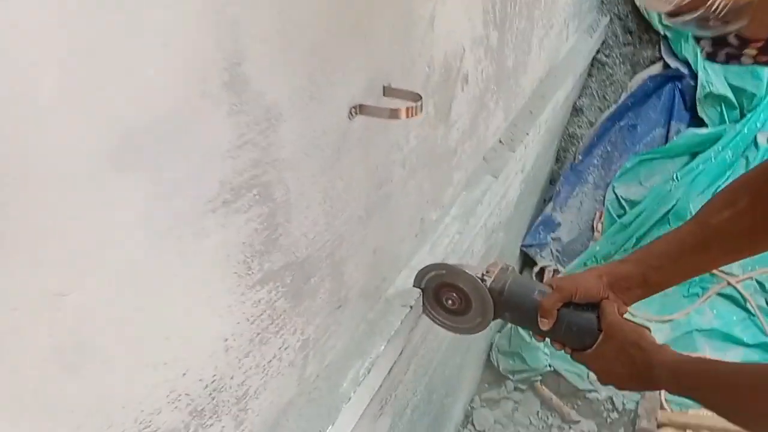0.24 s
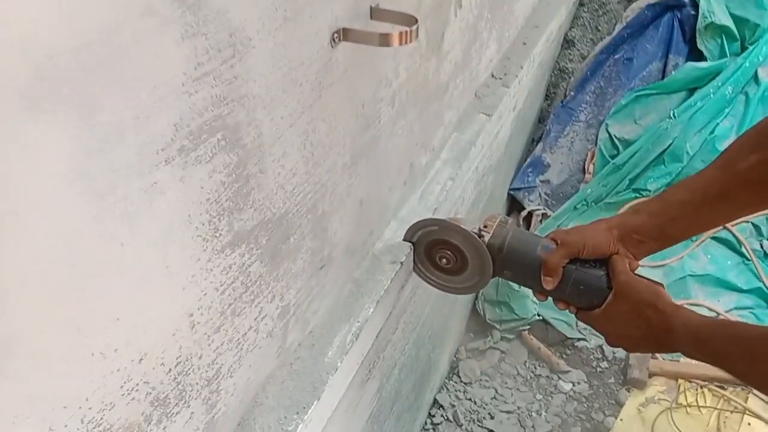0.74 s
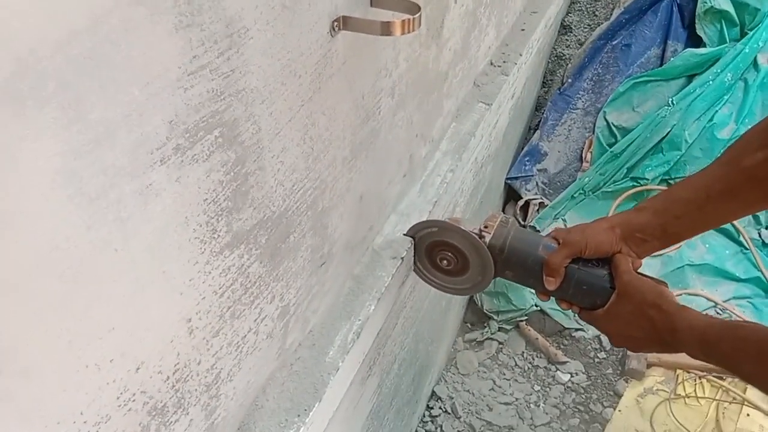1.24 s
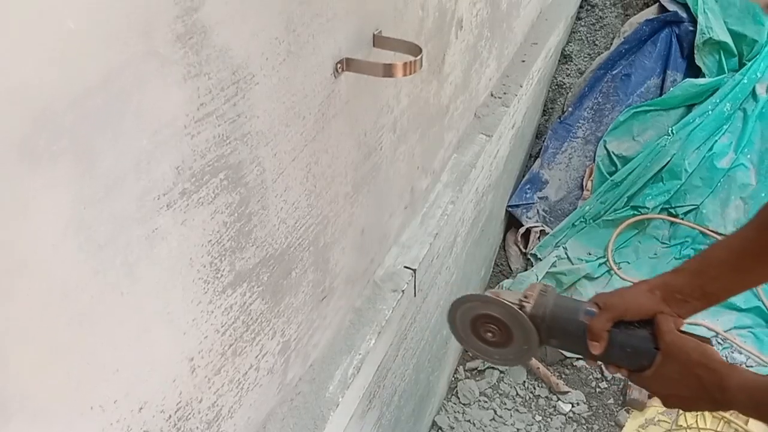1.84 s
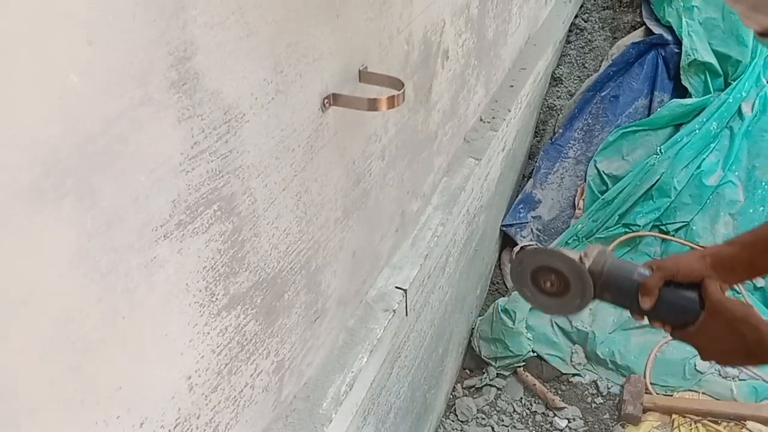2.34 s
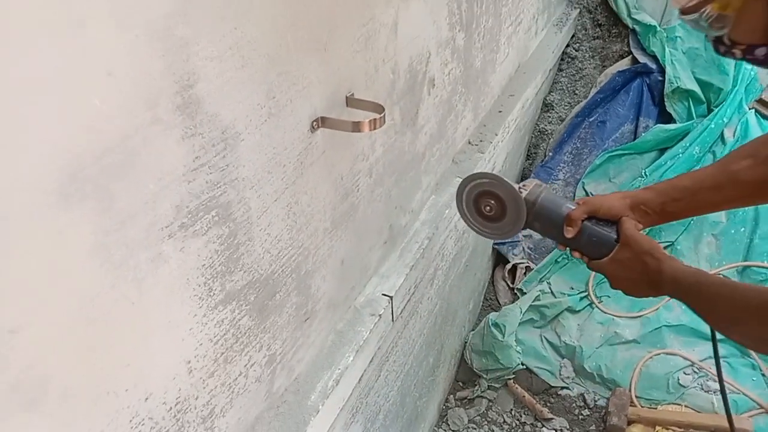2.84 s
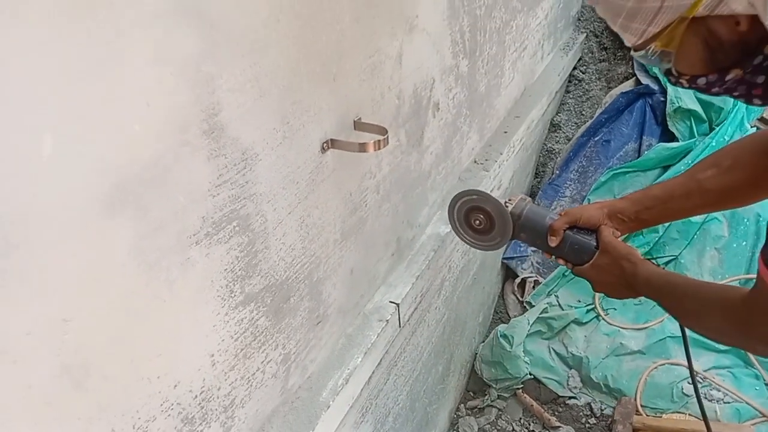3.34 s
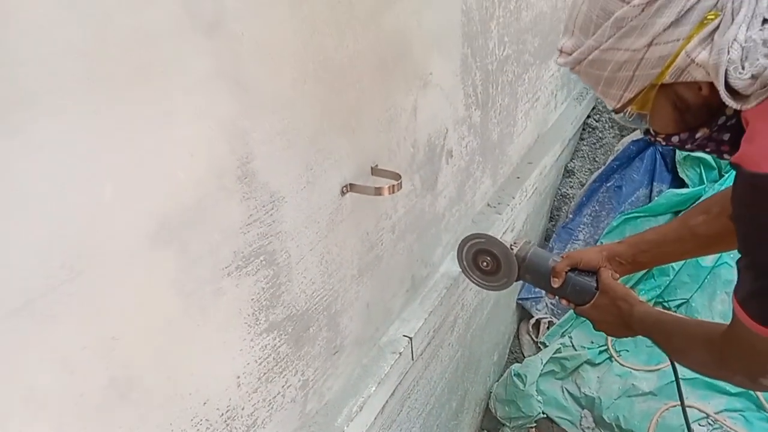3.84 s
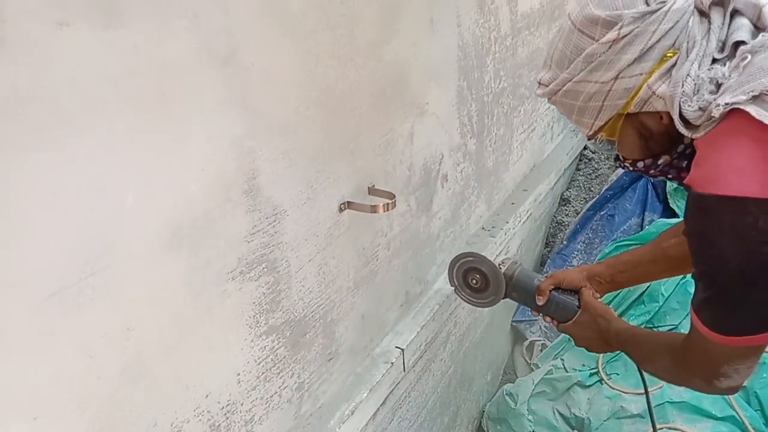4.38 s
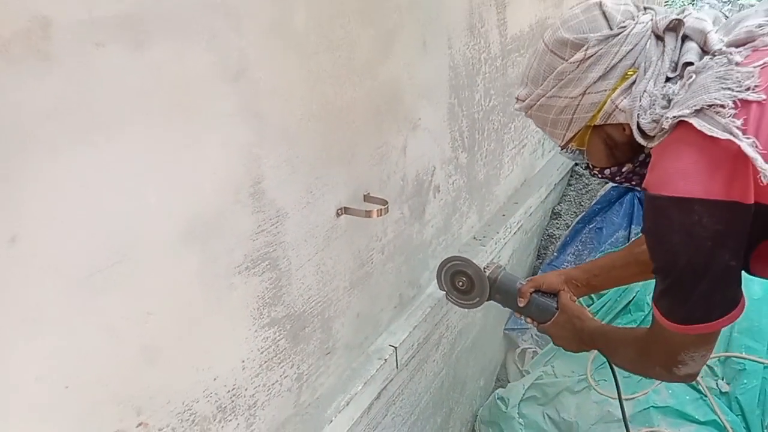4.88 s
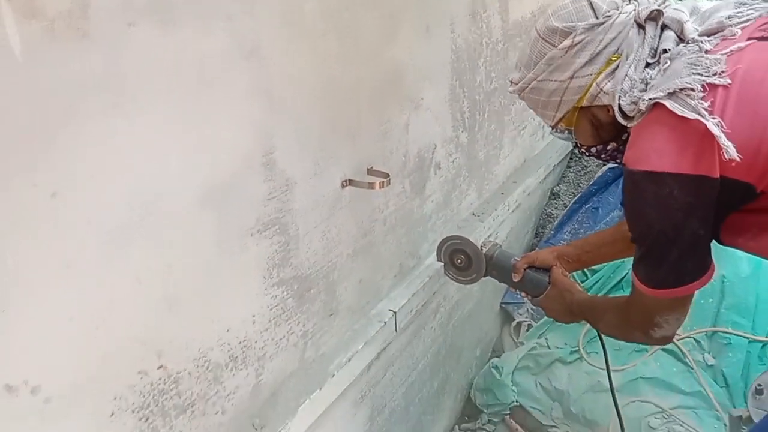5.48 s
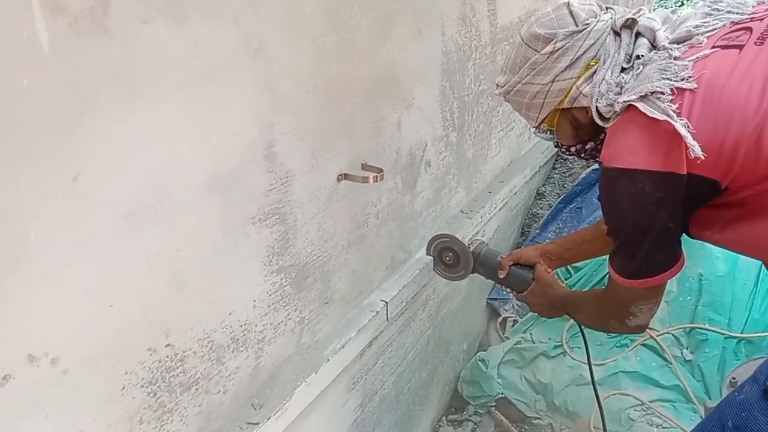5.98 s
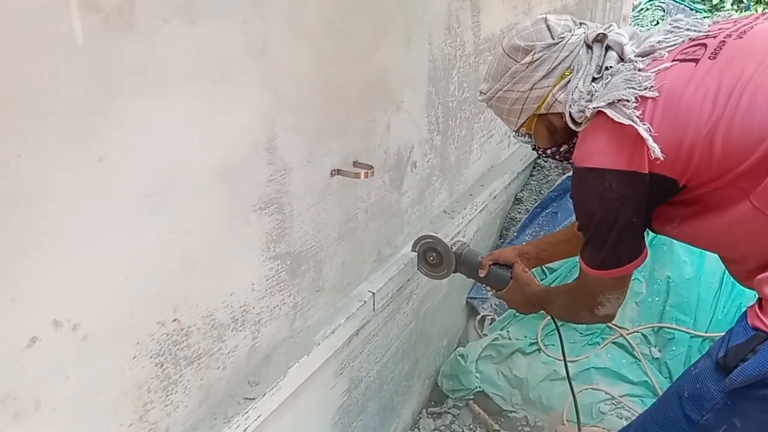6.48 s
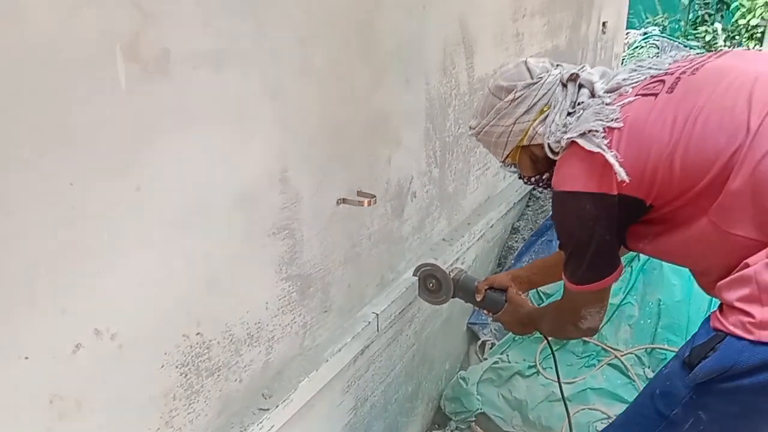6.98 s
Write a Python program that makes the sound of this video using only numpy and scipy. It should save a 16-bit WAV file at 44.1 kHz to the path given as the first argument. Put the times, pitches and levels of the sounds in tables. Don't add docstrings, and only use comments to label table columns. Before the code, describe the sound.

Outdoors, a handheld electric grinder runs throughout, one to two metres from a single microphone, dry and bright with little bass. From 0 to 1.8 seconds its disc cuts plastered wall: rushing fan and brush roar, fast gear buzz, dense steely ringing and crushed-grit hiss, strongest after 0.6. Chips tick and pop against the microphone, mostly between 0.45 and 1.75, and loud bursts overload into low thuds. Around 1.8 the disc scrapes out of its groove and the ringing drops away. From 2 to 3.5 the free-running motor roars on while loose gears knock in short, uneven, metallic clusters pitched near six kilohertz. From about 3.5 it eases back in; knocks continue until roughly 4.7 as ringing returns. By 4.9 the second cut is strong, gritty and fluttering, with a different ring, lasting to the end at 7.2 while getting slightly more distant. Faint outdoor rumble lies underneath.

```python
import sys
import numpy as np
from scipy import signal
from scipy.fft import rfft, irfft, next_fast_len
from scipy.io import wavfile
from scipy.ndimage import uniform_filter1d, map_coordinates

SR = 44100
rng = np.random.default_rng(int(sys.argv[2]) if len(sys.argv) > 2 else 0)


def natural_amplitude(level_db):
    exponent = np.asarray(level_db, float) / 20
    return 10 ** exponent


def generate_wav(signal):
    frames = np.transpose(np.atleast_2d(signal))
    scaled = np.clip(frames, -1, 1) * 32767
    pcm = np.round(scaled).astype(np.int16)
    wavfile.write(sys.argv[1], SR, pcm)


N = 318402
TIME = np.arange(N) / SR

# [t/s, pose]
POSE = [
    (0, 0),
    (1.8, 0),
    (2.4, 1),
    (3.4, 1),
    (4.3, 2),
    (7.22, 2),
]
# [t/s, distance/m]
DISTANCE = [(0, 1.37), (.6, 1.07), (1.8, 1.29), (1.9, 1.17), (2.9, 1.18), (4.9, 1.47), (5.2, 1.76),
            (6.3, 2.06), (7.22, 2.2)]
# [t/s, contact 0-1]
CONTACT = [
    (0, 0.99),
    (1.85, 0.8),
    (1.89, 0.1),
    (3.5, 0.07),
    (3.75, 0.6),
    (4.6, 0.6),
    (7.22, 0.86),
]
# [t/s,
# level/dB]
DISC_SWELL = [(0, -3.5), (.2, -5), (.56, -1), (.8, 1), (1.35, 0.5), (1.72, -2), (1.85, -10), (1.9, -10),
              (2.8, 3.5), (3.5, 3), (3.84, -2), (4.7, 0.5), (4.9, 5), (5.3, 4), (5.65, 1.5), (6.4, 3), (6.8, 4),
              (7.22, 2)]
# [t/s, pitch ratio at 1200 Hz]
TILT = [(0, .98), (.6, .92), (1.8, .97), (2.5, 1.06), (3.1, 1.04), (4.1, 1.11), (4.6, 1.01), (5, .95),
        (5.4, 1.01)]
# [f/Hz, density/dB per Hz]
ROAR = [(120, -90), (220, -47.5), (330, -23), (525, -18.5), (1000, -12.5), (1950, -12), (2500, -6.5),
        (2800, -7.5), (3700, -3.5), (4450, -6), (5500, -5.5), (6400, -6.5), (7200, -2), (7900, -3.5),
        (8800, -9.5), (9400, -22.5), (15500, -34)]
# [f/Hz, level/dB in pose 0, in pose 1, in pose 2]
HOUSING = [(1000, -41.5, -44.5, -40.5), (1327, -42, -46, -47), (2167, -43.5, -37, -38.5),
           (2450, -36, -34, -36), (2890, -51, -36, -39)]
# [f/Hz, level/dB in pose 0, in pose 1, in pose 2]
GUARD = [(3434, -34.5, -48, -29), (3066, -41, -33.5, -34)]
# [t/s, resonance f/Hz, level/dB]
GAP = [(0, 4150, -37), (.45, 4100, -26), (.55, 3630, -31), (1, 3750, -24), (1.8, 3800, -23),
       (2.1, 3684, -28), (2.5, 3470, -26.5), (2.8, 3906, -27.5), (3.2, 4250, -32), (3.8, 4500, -53),
       (5, 4110, -38.5), (7.22, 4220, -32.5)]
# [f/Hz, rms level/dB]
TONES = [(452.2, -59), (683.7, -58)]
DISC_HZ = [2430, 4700, 4790, 7200, 7570, 8390, 9030, 9535, 9970, 10630, 11200, 11765, 12530, 13070, 13590,
           14540, 14910, 15400]
# [width/Hz, level/dB]
DISC_FIRST_CUT = [(90, -30), (111, 11.5), (150, -11), (70, -16), (80, -22), (45, 11.5), (45, -21),
                  (110, -12), (200, -32), (100, -1.5), (60, -18), (100, -0.5), (190, 3.5), (200, -9),
                  (70, -29), (120, -5), (150, -9), (80, -20)]
# [width/Hz, level/dB]
DISC_SECOND_CUT = [(101, -23), (149, -1.5), (229, 2.5), (80, -6), (80, -19), (69.4, 2), (60, -27),
                   (130, -42), (192.4, -30), (80, -7.5), (70, -17), (100.3, -10), (150, -10), (130, -3.5),
                   (200, -23), (400, -15), (250, -22), (80, -10)]
# [f/Hz, density/dB per Hz]
DUST = [(500, -5), (1500, -20.5), (4000, -17.5), (5400, 1), (6500, 2.5), (7600, -36), (8100, -34),
        (9200, -10), (10000, -1.5), (11300, -24), (12200, -45.5), (13200, -8), (14000, -15), (15500, -5.5)]
# [t/s, level/dB]
CHATTER = [(0.0, -13.5), (0.74, -16), (1.2, -17), (1.68, -16), (1.81, -10.5), (1.9, -20), (2.27, -16),
           (2.85, -22.5), (2.97, -19), (3.32, -22.5), (3.46, -22.5), (3.72, -21), (4.0, -17.5), (4.38, -19),
           (4.58, -14), (5.11, -17.5), (6.01, -17.5), (7.22, -19.5)]
# [first knock t/s, last knock t/s, level/dB]
BURSTS = [(2.033, 2.0496, -4.5), (2.075, 2.0745, -2), (2.1045, 2.1266, -9), (2.158, 2.1743, -10),
          (2.2084, 2.22, -11), (2.2464, 2.2861, -10.5), (2.3114, 2.3295, -15), (2.4049, 2.417, -4.5),
          (2.491, 2.4965, -5), (2.5691, 2.6094, -4), (2.647, 2.6468, -7), (2.69, 2.7054, -5.5),
          (2.8464, 2.8543, -4.5), (2.9496, 2.9559, -2), (2.9772, 2.9774, -1.5), (3.18, 3.2112, -3),
          (3.2502, 3.2777, -6), (3.321, 3.3369, -4), (3.3776, 3.3776, -2.5), (3.4043, 3.4588, -3.5),
          (3.492, 3.4965, -2), (3.663, 3.6798, -9), (3.836, 3.91, -6), (3.949, 3.973, -6),
          (4.013, 4.0954, -13.5), (4.1356, 4.2181, -5.5), (4.3408, 4.42, -5.5), (4.4337, 4.4696, -4.5),
          (4.5312, 4.5765, -10.5), (4.6594, 4.683, -6)]
# [t/s, f/Hz]
CASE_HZ = [(0, 6050), (.6, 6350), (1.7, 6350), (1.9, 6180), (2.5, 6080), (3.2, 6270), (4.15, 6200),
           (4.75, 5900), (5.5, 6150)]
# [f/Hz, width/Hz, level/dB]
CASE = [(5830, 66, -9), (6130, 46, 6.5), (5890, 78, -30), (6946, 380, 9.5)]
# [f/Hz, density/dB per Hz]
CASE_HIGH = [(10500, -30), (11400, -16), (11800, 0), (12150, -5), (12600, -1), (13200, -3), (13900, -11),
             (14400, -13), (14700, -10), (15000, -15), (15500, -19)]
# [t/s, signed push, length/ms]
CHIPS = [(.4598, 0.13, 1.4), (.4939, -0.082, 1), (.6068, -0.02, 2.1), (.6358, 0.049, .9),
         (.674, 0.026, 3.0), (.761, 0.14, 1.2), (.8815, 0.054, 1.4), (.927, 0.019, 3.0),
         (0.9417, 0.014, 0.87), (0.9431, 0.16, 6.1), (1.0326, -0.13, 0.51), (1.0631, 0.22, 1.5),
         (1.1245, 0.11, 1.3), (1.2916, 0.28, 0.23), (1.2918, -0.047, 0.34), (1.2926, 0.16, 0.62),
         (1.4615, -0.032, 1.5), (1.5813, -0.033, 1.5), (1.7347, 0.012, 1.4), (1.8369, 0.0091, 1)]
# [f/Hz, density/dB per Hz]
RUMBLE = [(20, -6), (40, 0), (110, -3), (200, -12), (400, -45)]

ROAR_DB, RING_DB, DUST_DB = -34.5, -26, -33.5
MAINS_HZ = 100
IDLE_DUST_DB, SHALLOW_DUST_DB = -9, -7.5
SKITTER_DB, SKITTER_RATE = 1.2, 22
KNOCK_GAP_S = .0095
DEEP_CUT_S = (.5, 1.7)


def motor(load):
    throb = 1 + 0.025 * mains_wave(np.sin)
    rush = throb * natural_amplitude(0.41 * load + 1.12 * wobble(200)) * rng.standard_normal(N)
    roar = unit(filtered(rush, colour(ROAR)))
    roar_db = ROAR_DB + spread_db() + 13 + 0.28 * wobble(12)
    gap_hz, gap_db = curves(GAP)
    air = strands(GUARD, width_hz=480) + natural_amplitude(gap_db) * narrow(gap_hz, width_hz=620)
    air = throb * natural_amplitude(1.0 * load + 1.5 * wobble(30)) * air
    tones = second_cut() * sum(natural_amplitude(db + 5.5) * narrow(hz, width_hz=29) for hz, db in TONES)
    housing = natural_amplitude(-0.5) * strands(HOUSING, width_hz=79)
    return natural_amplitude(roar_db) * roar + air + housing + tones


def strands(table, width_hz):
    tilt = curves(TILT)[0]
    total = np.zeros(N)
    for hz, *pose_db in table:
        level = natural_amplitude(by_pose(pose_db) + 1.5 * wobble(1.756))
        pitch_hz = hz * tilt ** (1200 / hz) * (1 + .012 * wobble(1.2))
        total += level * narrow(pitch_hz, width_hz)
    return natural_amplitude(spread_db()) * total


def disc(load):
    swell_db, contact = curves(DISC_SWELL)[0], curves(CONTACT)[0]
    ring_db = RING_DB + spread_db() + swell_db + SKITTER_DB * wobble(SKITTER_RATE)
    ring_db = ring_db + 3.5 * np.minimum(ring_db + 31, 0)

    scrape_db = 6.5 * np.exp(-((TIME - 1.79) / .08) ** 2)
    pose_db = by_pose((0, IDLE_DUST_DB, SHALLOW_DUST_DB)) + 0.34 * IDLE_DUST_DB * (1 - contact)
    dust_db = DUST_DB + spread_db() + 0.44 * swell_db + pose_db + scrape_db
    dust_db = dust_db + 0.62 * SKITTER_DB * wobble(SKITTER_RATE)
    dust_db = dust_db + 1.6 * np.minimum(dust_db + 43.5, 0)

    stone = rng.standard_normal(N)
    steady = natural_amplitude(1.3 * load + 0.7 * wobble(20)) * stone
    first = unit(filtered(steady, disc_modes(DISC_FIRST_CUT)))
    second = unit(filtered(steady, disc_modes(DISC_SECOND_CUT)))
    far = second_cut()
    ring = (1 - far) * first + far * second
    grit = natural_amplitude(1.4 * load + 3 * wobble(150) + 1.5 * wobble(10)) * stone
    dust = unit(filtered(grit, colour(DUST)))
    return contact * natural_amplitude(ring_db + 3.5) * ring + natural_amplitude(dust_db + 10) * dust


def disc_modes(table):
    def response(f):
        gain = 0
        for centre, (width, db) in zip(DISC_HZ, table):
            detune = (centre ** 2 - f * f) / ((f + 1) * width)
            gain = gain + natural_amplitude(db) * (1 + detune ** 2) ** -.85
        return gain
    return response


def gears(load):
    t = np.arange(SR // 50) / SR
    rebound = 0.34 * (1 - np.exp(-t / 0.0017)) * np.exp(-t / 0.0067)
    blow = t / 0.00077 * np.exp(1 - t / 0.0005) + rebound
    size = np.abs(signal.fftconvolve(knock_force() + kick_force(), blow)[:N])
    case_hz, contact = curves(CASE_HZ)[0], curves(CONTACT)[0]
    note_hz = case_hz + 150 * wobble(450) + 420 * contact * wobble(600)
    note = np.sin(2 * np.pi * np.cumsum(note_hz) / SR)
    knock = filtered(size * note, lambda f: 0.8 + 0.35 * modes(CASE)(f))

    tooth_db = 2.5 * rng.standard_normal(N) + 1.0 * load + 2 * mains_wave(np.cos)
    teeth = (rng.random(N) < 900 / SR) * natural_amplitude(tooth_db)
    rattle = unit(np.abs(signal.fftconvolve(teeth, blow)[:N]))
    buzz = natural_amplitude(curves(CHATTER)[0] - 2.0 + 2.0 * wobble(35)) * rattle
    buzz_note = narrow(case_hz + 180 + 120 * wobble(60), width_hz=740)
    chatter = filtered(buzz * buzz_note, lambda f: 0.43 + .5 * modes(CASE)(f))

    hardness = uniform_filter1d(size + 0.26 * buzz, size=90, origin=44) ** 1.37
    high = filtered(hardness * natural_amplitude(2.1 * wobble(30)) * rng.standard_normal(N), colour(CASE_HIGH))
    rasp = contact * size * unit(filtered(rng.standard_normal(N), colour(ROAR)))
    ring = filtered(natural_amplitude(2.0) * knock + chatter, lambda f: 1 / (1 + (5150 / (f + 1)) ** 12))
    return ring + natural_amplitude(-5.5) * high + natural_amplitude(-8.5) * rasp


def knock_force(strays=28):
    force, chance = np.zeros(N), rng.standard_normal((len(BURSTS), 2, 16))
    for (first, last, db), (late, size) in zip(BURSTS, chance):
        count = round(abs(last - first) / KNOCK_GAP_S) + 1
        at = np.linspace(first, max(first, last), count)
        at[1:-1] += 0.22 * KNOCK_GAP_S * late[:count][1:-1]
        force[(at * SR).astype(int)] = natural_amplitude(db - 2.5 * np.clip(size[:count], -2, 1))
    place, size = rng.random((2, strays))
    at = np.interp(place, (0, 1), (1.9, 4.4))
    force[(at * SR).astype(int)] = natural_amplitude(-19 + 3.4 * (size + 3.5))
    return force


def kick_force():
    start, end = DEEP_CUT_S
    mains = np.arange(1, N / SR * MAINS_HZ - 1) / MAINS_HZ
    turns = np.arange(start, end, 1 / 165.3)
    at = np.concatenate([mains[(mains < start) | (mains > end)], turns])
    late, size = rng.standard_normal((2, len(at)))
    at = ((at + .0019 * (late - 1)) * SR).astype(int)
    force = np.zeros(N)
    force[at] = natural_amplitude(curves(CHATTER)[0][at] + 6 + 4 * np.clip(size, -3, 1.2))
    return force


def pattern(count=12):
    cycle = np.cumsum(33.4 * (1 + 0.0033 * wobble(1.97))) / SR
    return np.interp(cycle % 1, np.arange(count) / count, unit(rng.standard_normal(count)), period=1)


def chips():
    out, t = np.zeros(N + SR), np.arange(SR // 50) / SR
    for s, push, ms in CHIPS:
        shove = 3.5 * push * np.exp(-t / (ms * 0.00082)) * (1 - np.exp(-t / 0.00019))
        tick = 1.2 * abs(push) * np.exp(-t / .0006) * rng.standard_normal(len(t))
        swing = 0.53 * push * np.exp(-t / 0.00079) * np.sin(2 * np.pi * 1300 * t)
        out[round((s - .0004) * SR):][:len(t)] += shove + tick + swing
    return out[:N]


def floor():
    return natural_amplitude(-78 + 6 * wobble(6)) * unit(filtered(rng.standard_normal(N), colour(RUMBLE)))


def spread_db():
    return -20 * np.log10(curves(DISTANCE)[0])


def second_cut():
    return np.interp(TIME, (3.2, 4.9), (0, 1))


def by_pose(values):
    return np.interp(curves(POSE)[0], np.arange(3), values)


def mains_wave(shape):
    return shape(2 * np.pi * MAINS_HZ * TIME)


def unit(x):
    return x / np.sqrt(np.mean(x ** 2) + 1e-20)


def curves(rows):
    s, *cols = np.transpose(rows)
    return [np.interp(TIME, s, c) for c in cols]


def wobble(rate):
    at = np.arange(0, N + 32, 32)
    knots = rng.standard_normal(int(N * rate / SR) + 4)
    return np.interp(np.arange(N), at, map_coordinates(knots, [at * rate / SR]))


def filtered(x, response):
    m = next_fast_len(N + 8192)
    return irfft(rfft(x, m) * response(np.fft.rfftfreq(m, 1 / SR)), m)[:N]


def colour(points):
    hz, db = np.transpose(points)
    return lambda f: natural_amplitude(np.interp(np.log(f + 1), np.log(hz), db))


def modes(table):
    def response(f):
        total = 0
        for k, (centre, width, db) in enumerate(table):
            loss = 1j * f * width
            total = total + (-1) ** k * natural_amplitude(db) * loss / (centre * centre - f * f + loss)
        return total
    return response


def narrow(hz, width_hz):
    pole = np.exp(-np.pi * np.abs(width_hz) / SR)
    slow = signal.lfilter([1], [1, -2 * pole, pole ** 2], rng.standard_normal((2, N)))
    turn = 2 * np.pi * np.cumsum(hz * np.ones(N)) / SR
    return unit(slow[0] * np.cos(turn) + slow[1] * np.sin(turn))


def scene():
    load = pattern()
    tool = motor(load) + disc(load) + gears(load)
    tool = filtered(tool, lambda f: 1 / (1 + (190 / (f + 1)) ** 5))
    return (tool + chips() + floor())[None]


def low_pass(x):
    return signal.sosfilt(signal.butter(12, 15680, fs=SR, output="sos"), x)


def record(dry):
    power = uniform_filter1d(dry[0] ** 2, size=90)
    thud = 0.36 * power ** 4 / (power ** 3 + 0.064 ** 3)
    thud = filtered(thud, lambda f: 1j * f / (1j * f + 130))
    low_cut = lambda f: (1j * f) ** 3 / ((1j * f + 70) * (75 ** 2 - f * f + 1j * f * 80))
    x = filtered(dry[0] + thud, low_cut)
    x = x / (1 + np.abs(x / .85) ** 5) ** (1 / 5)
    x = filtered(x, lambda f: 1 / (1 + (f / 15480) ** 200))
    return low_pass(x[None])


dry = scene()
out = record(dry)
generate_wav(out)
```